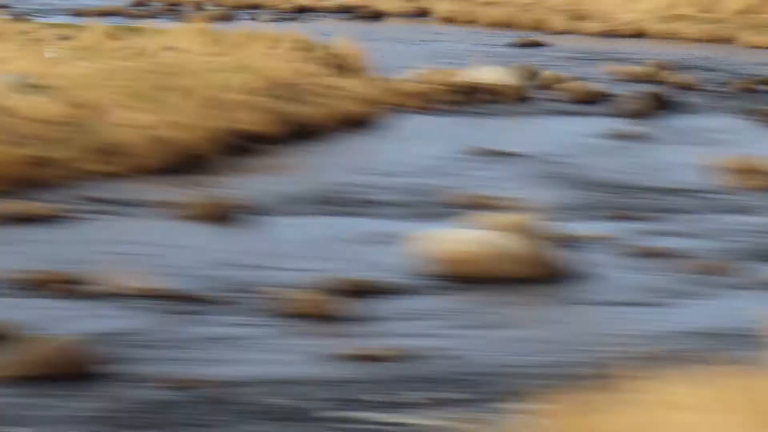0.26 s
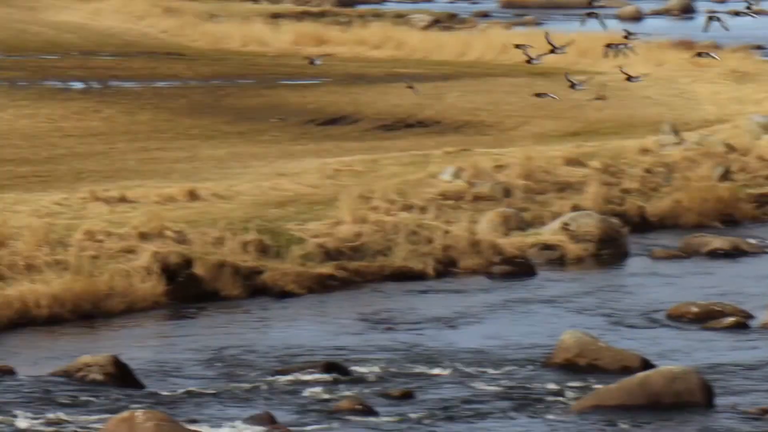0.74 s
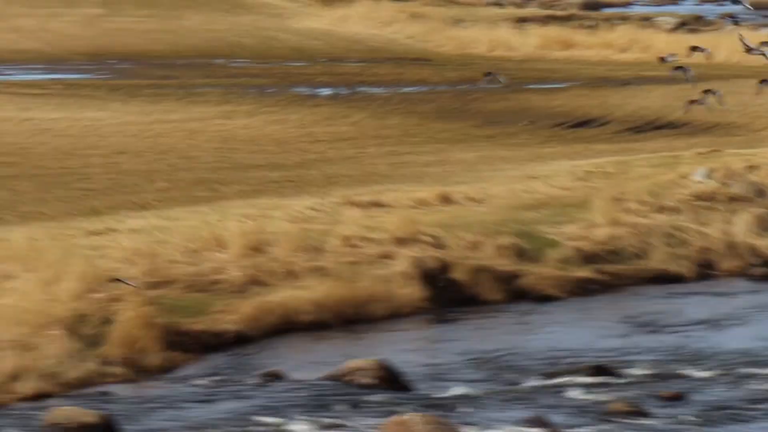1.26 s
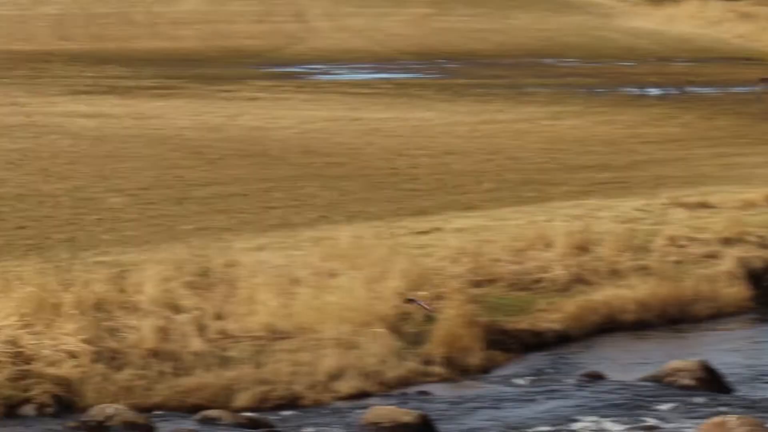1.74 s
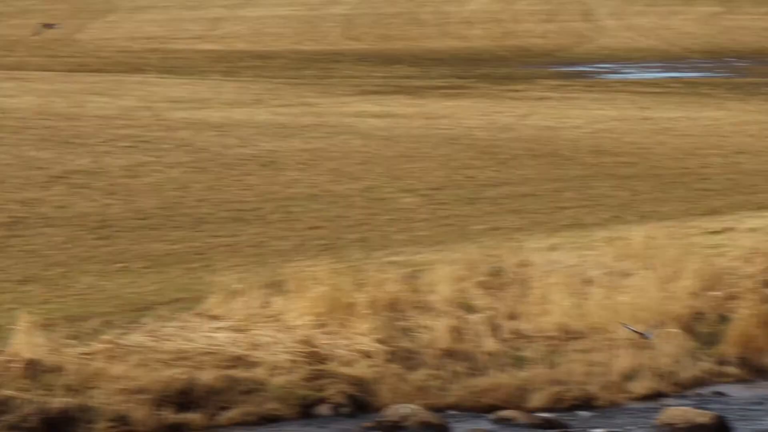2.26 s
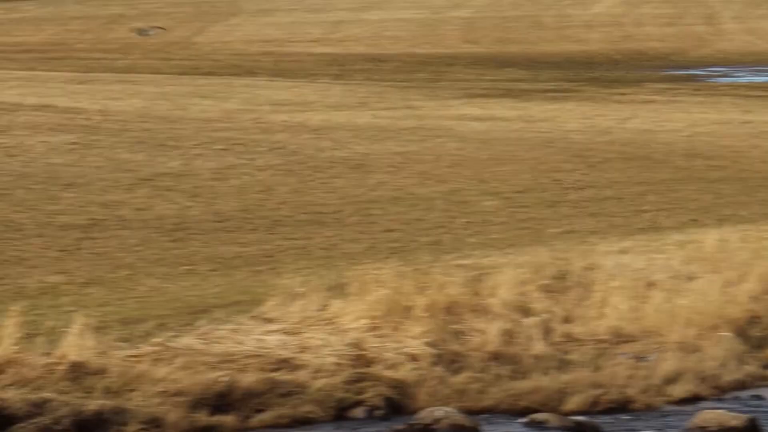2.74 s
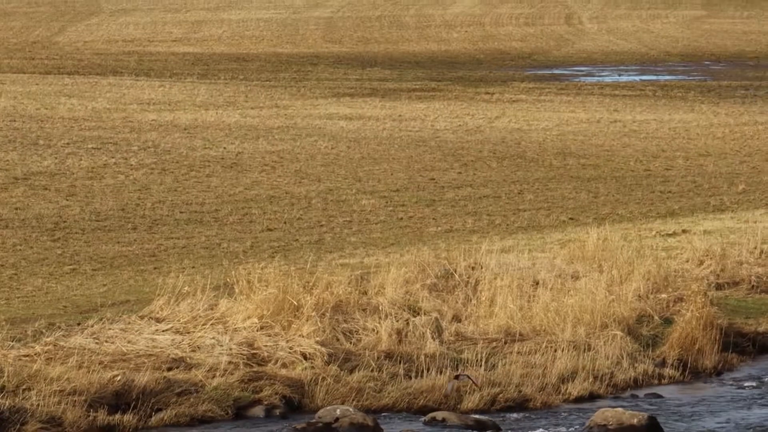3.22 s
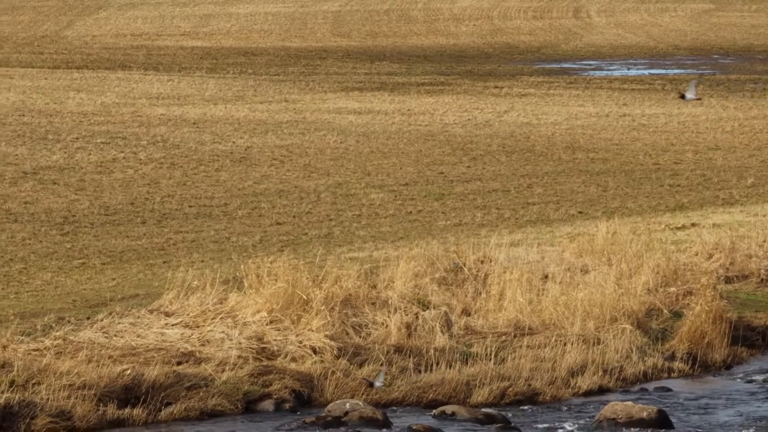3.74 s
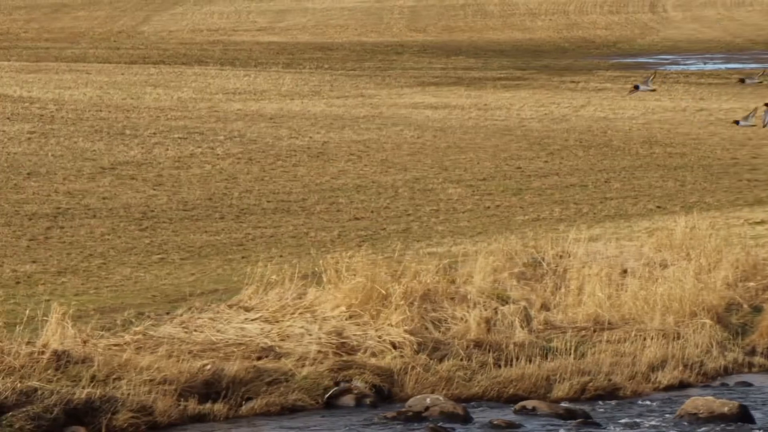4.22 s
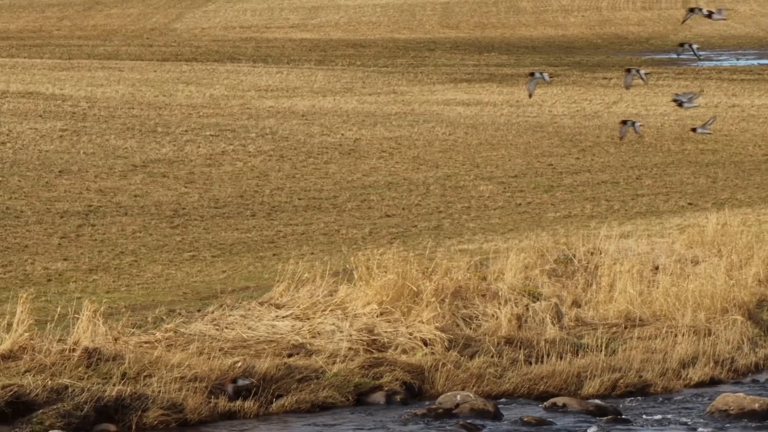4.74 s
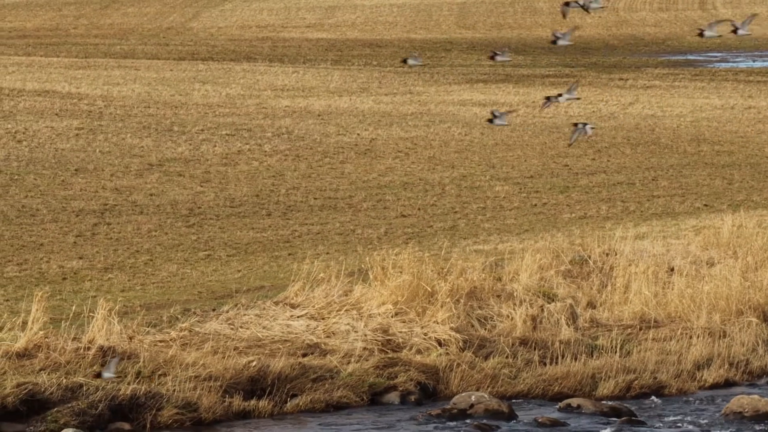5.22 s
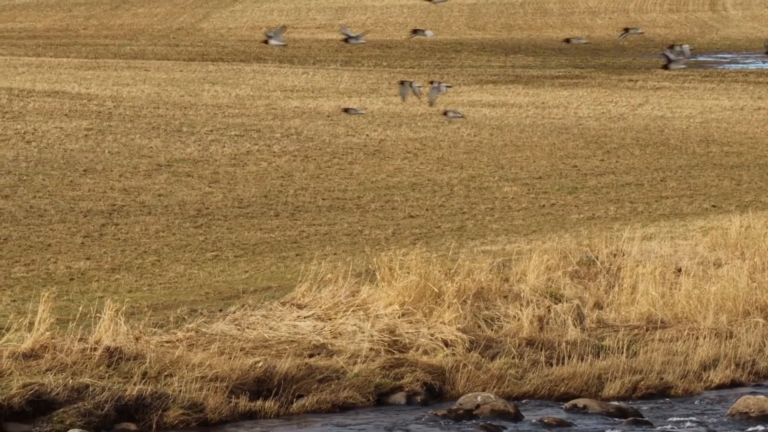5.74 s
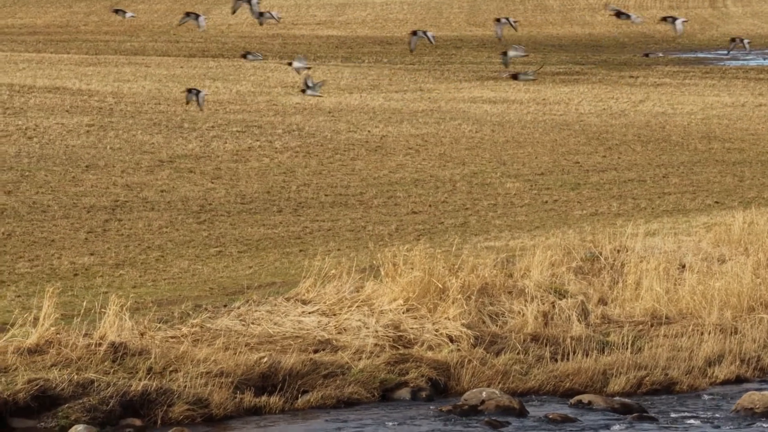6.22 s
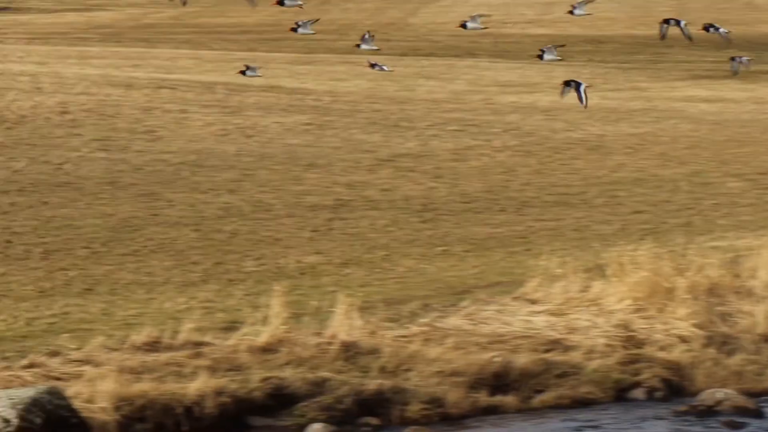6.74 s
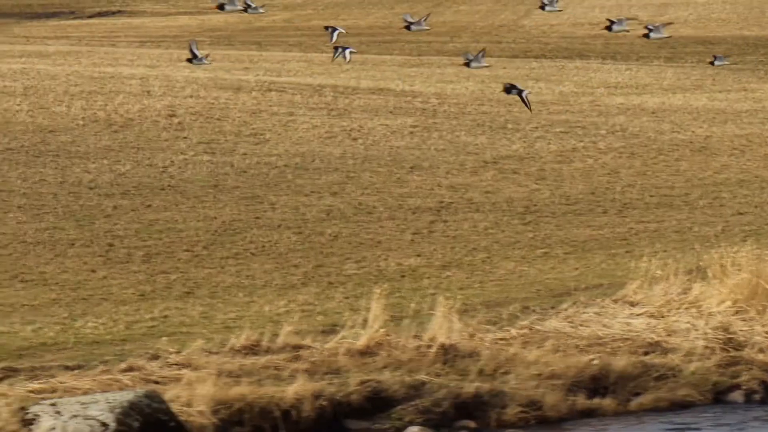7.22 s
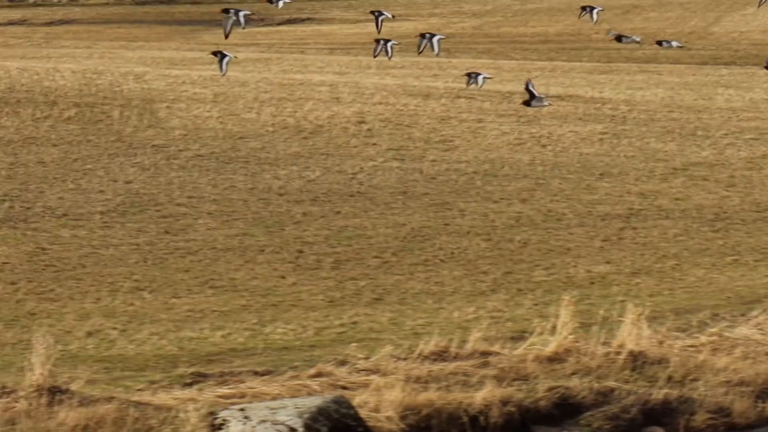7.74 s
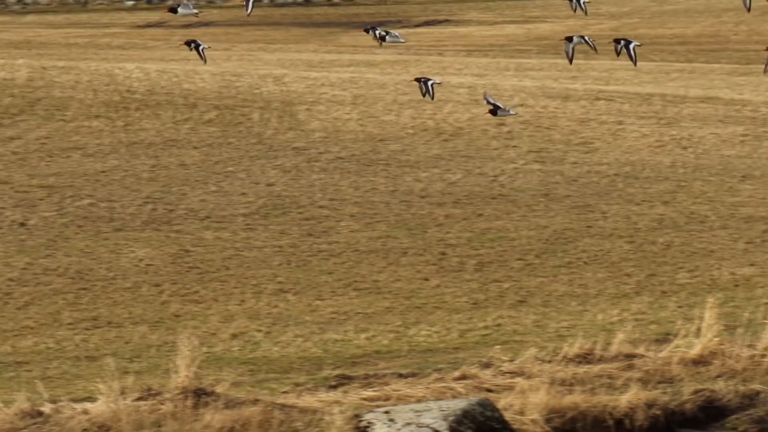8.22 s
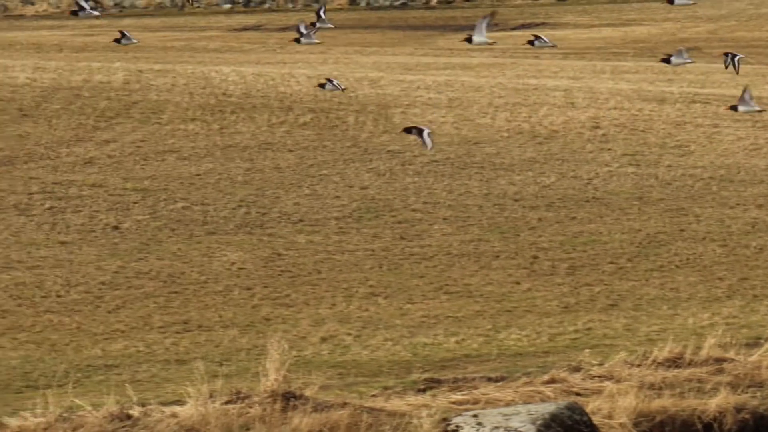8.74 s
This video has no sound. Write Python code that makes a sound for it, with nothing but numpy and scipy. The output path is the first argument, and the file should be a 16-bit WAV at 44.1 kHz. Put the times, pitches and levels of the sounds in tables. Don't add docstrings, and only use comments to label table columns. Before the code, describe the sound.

A stony river rushes steadily and softly across an open field, with a touch of brighter water hiss in the first second. Wind thumps the camera's stereo microphone strongly from 0.1 to 1.2 s, with a hard knock on the housing near 0.4 s and a duller tap near 1.35 s. From about 0.25 s, a flock of wading birds pipes in overlapping arched whistles, nearly pure in tone, starting low, rising quickly, then sagging; some break lower or leap up. The calls thin near 3 s, leaving water, mild wind and a lingering dull echo. From 3.8 s whistles return in clusters, mixed with tiny chirped flicks. A heavy gust and slap hit around 5.25 s. Calls crowd again around 7 s, more wind buffets from 7.5 to 7.9 s, and fainter whistles continue to 9 s with a last gust.

```python
import sys
import numpy as np
from scipy import signal
from scipy.io import wavfile
from scipy.ndimage import uniform_filter1d

SR = 44100
rng = np.random.default_rng(int(sys.argv[2]) if len(sys.argv) > 2 else 0)


def magnitude_from_level(level_db):
    exponent = np.asarray(level_db, float) / 20
    return 10 ** exponent


def put_to_file(sound):
    columns = np.atleast_2d(sound).T
    safe = np.clip(columns, -1, 1)
    whole_steps = np.round(safe * 32767)
    wavfile.write(sys.argv[1], SR, whole_steps.astype(np.int16))


N = 395577


def unit(x):
    return x / np.sqrt(np.mean(x ** 2))


def walk(rate_hz, count=N):
    hold = int(SR / rate_hz)
    held = np.repeat(rng.standard_normal(count // hold + 1), hold)
    slewed = uniform_filter1d(uniform_filter1d(held, hold), hold)
    return 1.3 * slewed[:count]


def band(x, lo_hz, hi_hz, order=2):
    return signal.sosfilt(signal.butter(order, [lo_hz, hi_hz], "bandpass", fs=SR, output="sos"), x)


def on_log(hz, points):
    point_hz, value = np.transpose(points)
    return np.interp(np.log(hz), np.log(point_hz), value)


def river():
    # f/Hz, density level/dB
    spectrum = [(76, -36), (130, -10.5), (433, -4.5), (574, -1.5), (1980, -17), (7590, -40.5),
                (8900, -46.5)]
    # f/Hz, correlation
    likeness = [(500, 0.95), (1000, 0.95), (2000, 0.15), (8500, -0.69)]
    # t/s, level/dB
    spray_track = [
        (0, -52),
        (0.698, -50.5),
        (1.201, -73),
        (2.5, -86),
        (2.76, -57),
        (2.86, -91.5),
    ]
    level_db = -35
    rush, swell = 0, walk(0.21)
    for hz in 130 * 2 ** np.arange(0, 6.2, .5):
        mid, side = band(rng.standard_normal((2, N)), hz / 2 ** .25, hz * 2 ** .25)
        alike = np.clip(on_log(hz, likeness), -1, 1)
        pair = np.sqrt(1 + alike) * mid + np.sqrt(1 - alike) * side * np.array([[1], [-1]])
        band_db = on_log(hz, spectrum) + .5 * swell + 1.1 * walk(7.1)
        rush = rush + magnitude_from_level(band_db) * pair
    s, db = np.transpose(spray_track)
    hiss = unit(band(rng.standard_normal((2, N)), 5000, 8000))
    spray = hiss * magnitude_from_level(np.interp(np.arange(N) / SR, s, db))
    return unit(rush) * magnitude_from_level(level_db) + spray


def gusts():
    # peak t/s, peak level/dB, time to fall 20 dB/s
    gust_events = [(0.1, -31, .25), (0.3, -20, .17), (0.68, -30, .6), (0.9, -27, .6), (1.08, -24, .35),
                   (2.32, -40.5, .5), (2.76, -41, .14), (3.0, -39, .3), (3.3, -33, .7), (3.74, -30, .45),
                   (4.04, -34, .13), (4.24, -31.5, .18), (4.42, -39, .35), (4.94, -28.5, .12),
                   (5.258, -16, .18), (5.5, -34.5, .28), (5.84, -35.5, .04), (6.2, -44, .08),
                   (6.86, -34.5, .07), (7.54, -22, .15), (7.7, -25, .25), (7.88, -25, .22), (8.24, -43, .3),
                   (8.74, -46, .1), (8.88, -32, .1), (8.96, -27.5, .15)]
    calm_db, rise_share = -55, 0.78
    t = np.arange(0, N / SR + .01, .005)
    s, peak_db, fade_s = np.transpose(gust_events)[:, :, None]
    each_db = peak_db - 20 * np.maximum((t - s) / fade_s, (s - t) / (rise_share * fade_s))
    return np.interp(np.arange(N) / SR, t, np.maximum(each_db.max(axis=0), calm_db))


def wind():
    gust_db = gusts() + 2.4 * walk(18)
    shared, own = rng.standard_normal((2, N)), rng.standard_normal((2, 2, N))
    deep = unit(band(0.71 * shared[0] + own[0], 36, 101, order=3)) * magnitude_from_level(0.88 * gust_db - 4.0)
    slap = unit(band(0.19 * shared[1] + own[1], 83, 194.6, order=3)) * magnitude_from_level(1.417 * gust_db + 4.5)
    port_db = np.array([[1.1], [-1.1]])
    return (deep + slap) * magnitude_from_level(port_db)


def arch(start_s, hold_s, top_hz, end_hz, db, run_up):
    # start of its whistle t/s, from t/s, to t/s, first f/Hz, last f/Hz
    flips = [
        (0.44, .718, .85, 1028, 979),
        (0.81, 1.232, 1.5, 1040, 1050),
        (1.44, 1.78, 2.2, 981, 980),
        (2.46, 2.492, 2.59, 1506, 1463),
        (3.775, 4.05, 4.23, 1056, 983),
        (4.72, 4.943, 5.13, 1025, 933),
        (5.3, 5.468, 5.565, 1510, 1464),
        (5.51, 5.563, 5.74, 1528, 1500),
        (6.565, 6.678, 6.778, 1535, 1448),
    ]
    # start of the whistle t/s, rise time/s
    slow_risers = [(0.25, .06), (0.44, 0.049), (4.09, 0.089), (4.17, 0.072), (4.65, .05), (4.85, .06),
                   (6.89, .07), (7.05, 0.054), (7.07, .09), (7.96, 0.062), (8.04, 0.068), (8.5, .05)]
    run_up_s, run_up_hz, run_up_db = .065, 827.8, -15.5
    break_hz, break_db = 1014, 0.5
    jump_s, landing_share, rise_s = 0.01292, .92, 0.0299
    sag_power, steady_sag, tiring_db = 3.2, .35, -1
    flip_s, flip_back_s = .013, .03
    fall_s, fall_share, fall_db = .038, .3, -11

    share = np.linspace(0, 1, 120)
    s = start_s + jump_s + share * (hold_s - jump_s)
    sag = steady_sag * share + (1 - steady_sag) * share ** sag_power
    for owner_s, slow_s in slow_risers:
        if abs(owner_s - start_s) < .008:
            rise_s = slow_s
            break
    hz = top_hz * (1 - (1 - landing_share) * np.exp(-(s - s[0]) / rise_s)) - (top_hz - end_hz) * sag
    for owner_s, first_s, last_s, first_hz, last_hz in flips:
        if abs(owner_s - start_s) < .008:
            back = 1 if first_hz < top_hz else np.clip(1 - (s - last_s) / flip_back_s, 0, 1)
            flipped_hz = np.interp(s, [first_s, last_s], [first_hz, last_hz])
            hz = hz + np.clip((s - first_s) / flip_s, 0, 1) * back * (flipped_hz - hz)
    if run_up:
        opening = [(start_s - run_up_s, run_up_hz, db + run_up_db), (start_s, break_hz, db + break_db)]
    else:
        opening = [(start_s, .9 * hz[0], db)]
    drop = [(s[-1] + part * fall_s, hz[-1] * (1 - part ** 1.4 * fall_share), db + part * fall_db)
            for part in (1 / 3, 2 / 3, 1)]
    return opening + list(zip(s, hz, db + tiring_db * share)) + drop


def whistle(rows, bright_db, bounce_us, lead_us):
    overtones_db = [3, -13, -25, -30, -44.5, -54]
    ground_share = 0.55
    s, hz, db = np.transpose(rows)
    start = int(s[0] * SR)
    t = np.arange(start, min(int(s[-1] * SR), N)) / SR
    glide_hz = uniform_filter1d(np.interp(t, s, hz), int(0.0042 * SR))
    haste = np.clip(np.abs(np.gradient(glide_hz)) * SR / 6500 - .3, 0, 1)
    pitch_hz = glide_hz * (1 + (0.0025 + 0.011 * haste) * walk(89.35, count=len(t)))
    phase = 2 * np.pi * (np.cumsum(pitch_hz) / SR + rng.random())
    edge = np.clip(np.minimum(t - s[0], s[-1] - t) / .012, 0, 1) ** 2
    side = np.array([[.5], [-.5]])
    arrival = phase + 2 * np.pi * pitch_hz * side * lead_us / 1e6
    call = 0
    for k, partial_db in enumerate(overtones_db):
        bounce = 2 * np.pi * (k + 1) * pitch_hz * bounce_us / 1e6
        flutter_db = (1.28 + .5 * k + 3 * haste) * walk(31.9, count=len(t))
        slip_db = -(2 + 4 * abs(k - 1)) * haste
        gain = magnitude_from_level(partial_db + 0.41 * k * min(bright_db, 12) + slip_db + flutter_db)
        direct = np.sin((k + 1) * arrival)
        reflected = ground_share * np.sin((k + 1) * arrival - bounce)
        call = call + gain * (direct + reflected)
    port_db = np.interp(t, s, db) + side * (-0.16 + 0.081 * lead_us)
    return start, call * edge * np.sqrt(2) * magnitude_from_level(port_db)


def decay(t60_s, lo_hz, hi_hz, onset_s, apart):
    t = np.arange(int(1.3 * t60_s * SR)) / SR
    shared, own = rng.standard_normal(len(t)), rng.standard_normal((2, len(t)))
    tail = (shared + apart * own) * magnitude_from_level(-60 * t / t60_s) * np.clip(t / onset_s, 0, 1)
    return band(tail, lo_hz, hi_hz) / np.sqrt(np.sum(tail[0] ** 2))


def flock():
    # voice break t/s, hold/s, top f/Hz, end-of-hold f/Hz, level/dB
    run_up_whistles = [
        (0.253, 0.25, 1298, 1258, -32),
        (0.305, .335, 1262, 1087, -31),
        (0.439, .41, 1274, 960, -23.5),
        (0.807, 0.45, 1388, 1090, -33),
        (1.44, 0.4, 1211, 1070, -28.5),
        (1.731, 0.53, 1394, 1200, -34.5),
        (1.828, .37, 1351, 1285, -25),
        (2.13, 0.66, 1305, 1150, -35.5),
        (2.15, 0.32, 1291, 1244, -32),
        (2.427, 0.17, 1251, 1134, -34),
                       (3.775, 0.44, 1244, 994, -26.5), (4.101, 0.33, 1382, 1261, -26),
                  (4.17, 0.299, 1374, 1264, -32.5), (4.655, 0.35, 1436, 1260, -30),
                  (4.65, 0.56, 1361, 1240, -25), (4.721, 0.44, 1184, 1042, -32.5),
                  (4.85, .31, 1230, 1250, -35), (5.51, .26, 1420, 1350, -30), (5.72, .41, 1362, 1300, -30),
                  (5.895, 0.21, 1342, 1134, -30.5), (6.565, .335, 1305, 1214, -30.5),
                  (6.89, .35, 1398, 1256, -26.5), (7.05, .4, 1336, 1205, -30.5),
                  (7.07, .425, 1361, 1285, -26), (7.32, 0.43, 1300, 1077, -33),
                  (8.04, 0.24, 1318, 1244, -37.5), (8.499, .31, 1243, 1072, -33.5),
                  (8.7, .3, 1229, 1290, -33.5), (8.6, .36, 1251, 1185, -36.5)]
    # start t/s, hold/s, top f/Hz, end-of-hold f/Hz, level/dB
    joining = [(0.503, .56, 1375, 1317, -31.5), (1.288, .13, 1290, 1264, -31), (1.442, .4, 1380, 1260, -42),
               (1.463, .34, 1302, 1215, -32), (1.85, .21, 1200, 1120, -33), (2.459, .21, 1330, 1210, -30),
               (4.091, .36, 1360, 1194, -31.5), (5.302, .33, 1324, 1253, -28),
               (5.389, .41, 1272, 1225, -31.5), (5.784, .2, 1361, 1255, -32), (7.698, .2, 1047, 969, -26.5),
               (7.961, .58, 1285, 1130, -34)]
    # t/s, length/s, first f/Hz, last f/Hz, level/dB
    flicks = [(3.836, 0.052, 953, 1376, -26), (4.398, 0.027, 1190, 899, -29),
              (5.189, 0.045, 1084, 1253, -35.5), (6.074, 0.038, 837, 1012, -32),
              (6.292, 0.064, 895, 880, -38.5), (6.764, 0.03, 880, 1344, -23.5),
              (7.44, 0.09, 1221, 908, -33), (7.627, 0.037, 892, 989, -33.5), (0.238, .05, 842, 1106, -33),
              (0.52, .06, 1207, 863, -34), (0.604, .07, 1194, 900, -34), (1.357, .06, 797, 960, -38),
              (1.767, .06, 1135, 894, -33), (1.83, .1, 1270, 958, -34), (2.077, .07, 820, 1064, -34),
              (2.72, .06, 1176, 867, -28.5), (5.126, 0.065, 1200, 858, -33.5),
              (5.626, 0.052, 892, 1052, -37), (6.102, .06, 1268, 847, -33), (6.793, .07, 788, 922, -40),
              (8.423, .07, 735, 992, -38.5), (8.516, 0.044, 815, 1010, -31.5),
              (8.853, 0.084, 909, 1078, -36.5)]
    # brightness/dB, ground
    whistle_callers = [(3, 660), (1.5, 136), (-12.5, 490), (-0.5, 53), (-9.5, 483), (3.5, 34),
                       (-5.5, 1484), (10.5, 136), (8.5, 690), (3.5, 88),
                       (-3.5, 502), (-0.5, 500), (14, 660), (1.5, 340), (-5.5, 487), (17, 104), (7, 140),
                     (-5.5, 620), (16, 91), (0, 1564), (0.5, 249), (6.5, 509), (-0.5, 690), (-5, 504),
                     (-4, 634), (11.5, 89), (5.5, 117), (-2.5, 30), (11, 183),
                       (-11.5, 20), (-2.5, 164), (12, 37), (4.5, 150), (-16.5, 480), (-3.5, 293),
                       (-1, 1007), (-2, 51), (-17.5, 300), (16, 710), (-1, 430), (-3.5, 1005)]
    # t/s, left lead/us
    bearing = [
        (0, 9),
        (1.6, 41.5),
        (2.5, 2.5),
        (4.0, -10),
        (5.5, 1),
        (7.1, 60.5),
        (8.97, 6.5),
    ]
    flock_width_us = 35.7
    echo_db, near_db = -9.5, -8.5

    calls = [arch(*row, True) for row in run_up_whistles]
    calls += [arch(*row, False) for row in joining]
    calls += [[(s, first_hz, db), (s + length_s, last_hz, db)] for s, length_s, first_hz, last_hz, db in flicks]
    callers = whistle_callers + [(-1.5, 470)] * len(flicks)
    direct = np.zeros((2, N))
    for rows, caller in zip(calls, callers):
        lead_us = np.interp(rows[0][0], *np.transpose(bearing)) + flock_width_us * rng.standard_normal()
        start, call = whistle(rows, *caller, lead_us)
        direct[:, start:start + call.shape[1]] += call
    response = magnitude_from_level(echo_db) * decay(2.7, 300, 1750, onset_s=0.051, apart=0.63)
    near = magnitude_from_level(near_db) * decay(.3, 900, 12000, onset_s=0.0051, apart=0.78)
    response[:, :near.shape[1]] += near
    return direct + signal.fftconvolve(direct.mean(axis=0, keepdims=True), response, axes=1)[:, :N]


def knock():
    # t/s, f/Hz, t60/s, level/dB
    modes = [
        (0.422, 466.4, 0.051, -9.5),
        (0.426, 272, 0.074, -14.5),
        (1.348, 175, 0.093, -18.5),
        (5.245, 152, 0.17, -17.5),
    ]
    out, age_s = np.zeros(N), np.arange(SR // 3) / SR
    for s, hz, t60_s, db in modes:
        envelope = magnitude_from_level(db - 60 * age_s / t60_s) * (1 - np.exp(-age_s / 0.0012))
        out[int(s * SR):][:len(age_s)] += envelope * np.sin(2 * np.pi * hz * age_s)
    return out


def scene():
    return river() + wind() + flock() + knock()


def band_limit(x):
    return signal.sosfilt(signal.butter(12, 9050, fs=SR, output="sos"), x)


def record(dry):
    top_hz = 8900
    dull = signal.sosfilt(signal.ellip(8, .2, 60, top_hz, fs=SR, output="sos"), dry)
    return band_limit(dull)


dry = scene()
out = record(dry)
put_to_file(out)
```